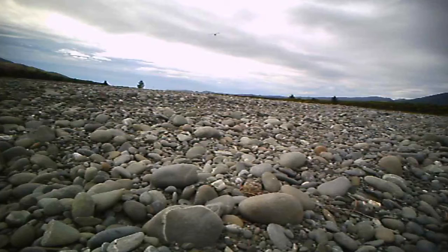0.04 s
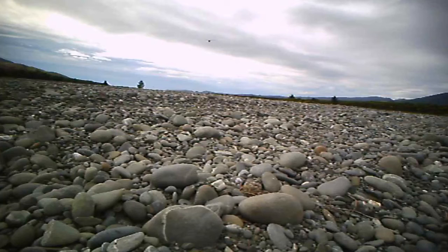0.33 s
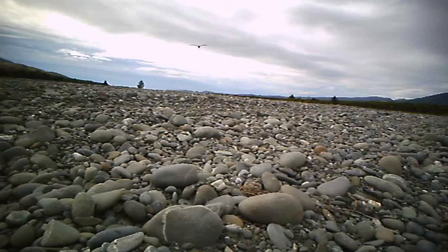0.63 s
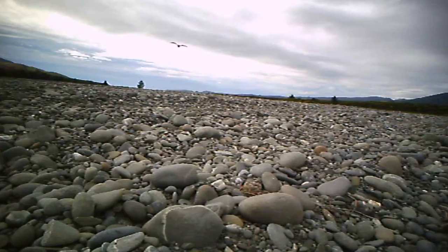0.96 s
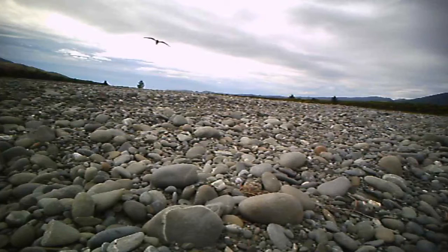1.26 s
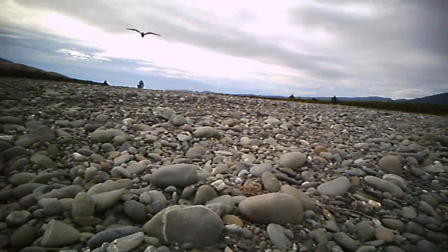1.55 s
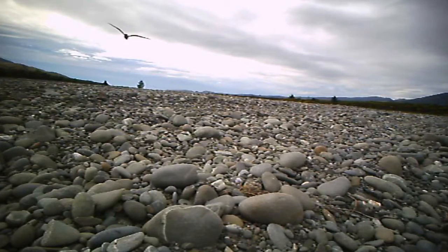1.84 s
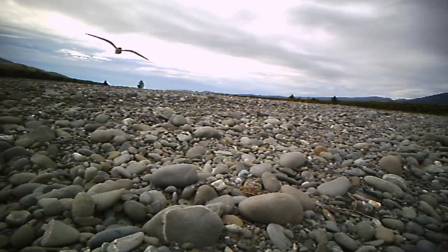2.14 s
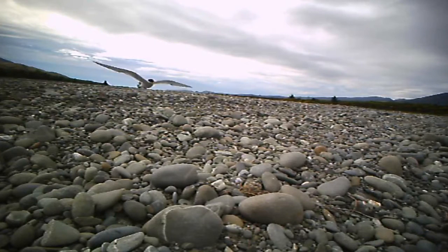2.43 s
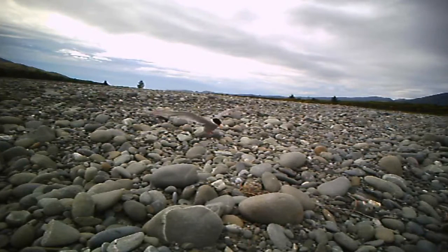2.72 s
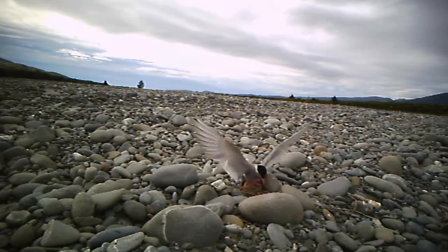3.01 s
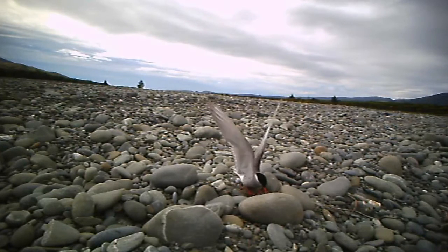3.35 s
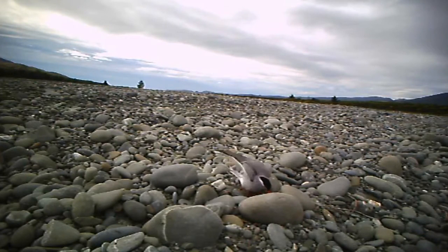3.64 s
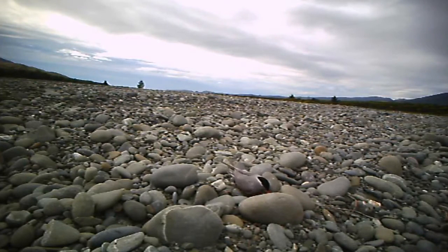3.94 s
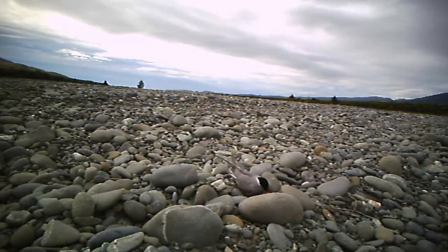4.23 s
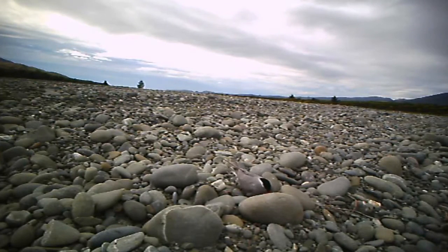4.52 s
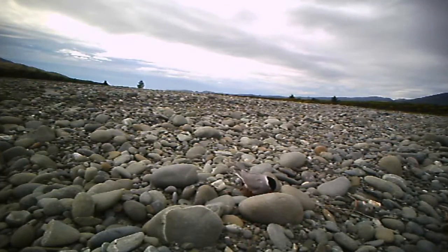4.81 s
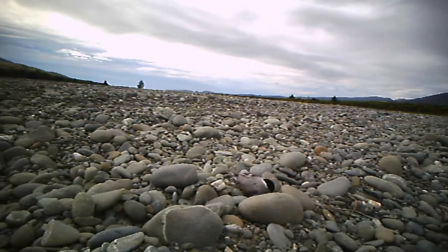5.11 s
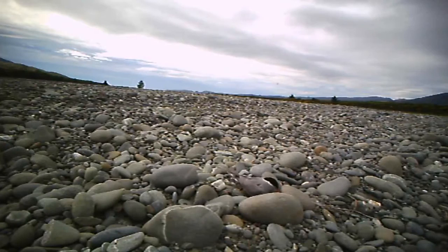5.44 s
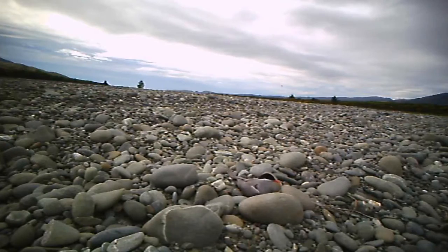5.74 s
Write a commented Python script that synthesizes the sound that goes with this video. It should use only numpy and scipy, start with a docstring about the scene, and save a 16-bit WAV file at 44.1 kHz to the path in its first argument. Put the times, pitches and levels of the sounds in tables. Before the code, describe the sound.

A seabird colony's high, arching cries and rattling rasps carry over gusty wind rumble, until one close bird gives three sharp calls.

```python
"""Tern colony on a stony riverbed, heard from the pebbles beside a nest.
Birds near and far cry (six partials on a pitch arch, shaped by the throat) and rasp (pulsed tone and
hiss); one lands with low wingbeats, then gives three sharp close calls. Stones scatter the sound.
Wind eddies buffet the microphone ports and ease after 4 s; the left port pops once.
A soft rush of air and river lies underneath; it and the far colony duck late on."""
import sys
import numpy as np
from scipy import signal
from scipy.fft import rfft, irfft
from scipy.io import wavfile
from scipy.ndimage import map_coordinates

SR = 44100
rng = np.random.default_rng(int(sys.argv[2]) if len(sys.argv) > 2 else 0)


def master_out(mix):
    """Clip the mix to full scale and print it as 16-bit PCM to the path in sys.argv[1]."""
    frames = np.transpose(np.atleast_2d(mix))
    ceiling = np.clip(frames, -1, 1)
    pcm = np.round(ceiling * 32767).astype(np.int16)
    wavfile.write(sys.argv[1], SR, pcm)


N = 258867
TIME_S = np.arange(N) / SR
BINS_HZ = np.maximum(np.arange(N // 2 + 1) * SR / N, 1)
SIDES = np.array([[.5], [-.5]])   # splits a left-minus-right difference

# Cries: (start [s], length [s], crest [Hz], relative level [dB], brightness [dB/octave], fall bend [-])
# Bend up to 1: straight slide; 3: held, then dropped.
NEAR_CRIES = [(0.534, 0.16, 2114, -42, 6.5, 1.5), (0.563, 0.22, 2240, -40.5, 5, 1.3),
              (0.736, 0.16, 2050, -52.5, -10.5, 1.7), (0.749, 0.039, 2090, -47, 1, 1.4),
              (1.006, 0.1, 2222, -37.5, 2.5, 1.47), (1.054, 0.112, 2230, -43.5, 4.0, 1.2),
              (1.092, 0.025, 2530, -39.5, -8, 1.7), (1.228, 0.116, 2380, -32.5, -1.5, 2),
              (1.271, 0.16, 1950, -46.5, 4, 0.99), (1.423, 0.087, 2303, -34, 1, 6),
              (1.446, 0.073, 2070, -43.0, -4, 1.9), (1.503, 0.17, 2137, -43.5, 4, 1.5),
              (1.639, 0.063, 2265.0, -36, 6, 2.1), (1.682, 0.088, 2155, -39, 2, 2.2),
              (1.873, 0.12, 2127, -38.5, 0.5, 1.1), (1.892, 0.13, 2512, -37.0, -1, 2.6),
              (2.052, 0.026, 2209.0, -52, -1.5, 2.0), (2.143, 0.039, 2267, -38.5, -1, 1.2),
              (2.175, 0.15, 2516, -39.5, -2, 1.1), (2.358, 0.026, 2140, -47, 10, 1.2),
              (2.385, 0.044, 2526, -45, -4, 1.2), (2.484, 0.15, 2242, -38, 3.5, 1.04),
              (2.531, 0.124, 2110, -42.5, 1, 1.53), (2.644, 0.095, 2570, -43.5, -2.5, 3),
              (2.808, 0.023, 2245, -38.5, -7, 2.1), (2.865, 0.08, 2170, -41, 6.5, 1.67),
              (2.944, 0.059, 2470, -38.5, 0.5, 1.5), (3.03, 0.039, 2230, -44.5, 3.5, 0.84),
              (3.187, 0.15, 2090, -42.5, 0, 2), (3.261, 0.086, 2499.0, -55.0, -8, 2.1),
              (3.444, 0.105, 2091.0, -45, -3, 1.6), (3.605, 0.2, 2133, -36.5, 1.0, 0.33),
              (3.749, 0.1, 2300, -41, 0.0, 1.8), (3.781, 0.13, 2124, -51.5, 7.5, 2),
              (3.929, 0.021, 2580, -43, -0.5, 1.6), (3.995, 0.041, 2154.0, -37.5, -2.5, 2.5),
              (4.019, 0.13, 2323, -38.5, -3.5, 2.15), (4.111, 0.12, 2210, -51, 2, 1.3),
              (4.326, 0.14, 2170, -56, -4, 1.6), (4.398, 0.23, 2208, -50, 1, 2.1),
              (4.578, 0.034, 2368, -39, 1, 3.3), (4.656, 0.041, 2276, -49, -5, 3.9),
              (4.78, 0.14, 2554, -54, -6.5, 1), (4.834, 0.135, 2644, -50, 4, 0.63),
              (4.849, 0.11, 2116, -50.5, 0.0, 2.5), (5.048, 0.086, 2247, -40.5, -2, 2),
              (5.055, 0.159, 2060, -63, 0.0, 0.5), (5.201, 0.23, 2210, -43, 4.5, 2.2),
              (5.401, 0.095, 2160, -39.5, 5, 1.5), (5.466, 0.083, 2485.0, -49.5, 3.5, 1.6),
              (5.746, 0.13, 2378, -51.5, -3.5, 1.3)]
NEST_CALLS = [(5.332, 0.037, 2366, -17, 0.44, 2.4), (5.426, 0.037, 2419, -13, -1, 1.55),
              (5.564, 0.041, 2420, -17, -1.6, 1.5)]
# Throat responses: (frequency [Hz], gain [dB])
THROAT = [(1700, -12.5), (2050, -11.5), (2300, -7.5), (2550, 0.5), (4000, -6.5), (4400, -6), (4750, -3.5),
          (5300, 5), (6200, -.5), (7000, -1.5), (7700, -4), (8700, -9.5), (10500, -15), (11700, -15),
          (13500, -42)]
NEST_THROAT = [(2400, -7.5), (4800, -8), (6000, 5.5), (7200, 1), (9600, -10.5), (12000, -5), (14400, -23)]
# Rattling rasps: (start [s], length [s], relative level [dB], hiss gain [dB])
RASPS = [(0.926, 0.25, -44.5, 6), (1.605, 0.28, -50.5, 10), (2.198, 0.17, -59.5, 14),
         (2.982, 0.24, -48.5, 1), (3.923, 0.3, -57.5, 11.5), (5.133, 0.16, -73, 23)]
# Low thumps of air, mostly right: wind gusts and, around 2.8-3.9 s, a landing bird's wingbeats.
# (centre [s], level [dB], sigma [s], left minus right [dB])
AIR_THUMPS = [(1.166, -40, 0.012, 27), (1.423, -35, 0.017, -19), (2.07, -30, 0.013, -23),
              (2.188, -38.5, 0.049, -13), (2.556, -41, 0.03, -5), (2.865, -36.5, 0.077, -35),
              (2.986, -32, 0.0089, -30), (3.403, -43.5, 0.11, -22.5), (3.823, -33, 0.02, -37),
              (4.045, -46, 0.058, -6)]
# Air puffs on the ports: (centre [s], level [dB], sigma [s])
BUFFETS = [(1.035, -36.5, 0.049), (1.433, -40.5, 0.0081), (4.585, -45, 0.011), (4.648, -49.5, 0.021)]
# Wind strength: (time [s], relative level [dB])
WIND_LEVEL = [(0.65, -63.5), (0.88, -55), (1.58, -49.5), (1.85, -55.5), (2.42, -55.5), (3.01, -38),
              (3.89, -47), (4.23, -75), (5.46, -66.5), (5.87, -77.5)]
# Background levels of far colony and rush, ducked by the recorder's noise suppression
# near 4.3, 5.0 and 5.7 s: (time [s], relative level [dB])
FAR_DUCKED_LEVEL = [(.5, -39.5), (.65, -42.5), (.87, -43), (1.45, -37.5), (2.25, -39), (2.44, -42),
                    (2.9, -38.5), (3.3, -41.5), (4.05, -41.5), (4.32, -53), (4.62, -42), (4.87, -49.5),
                    (4.99, -50.5), (5.12, -40), (5.42, -32.5), (5.56, -47), (5.68, -58.5), (5.82, -51)]
RUSH_DUCKED_LEVEL = [(0.65, -64), (0.72, -59), (0.84, -63.5), (3.99, -63), (4.26, -72.5), (5.35, -65.5),
                     (5.45, -65), (5.59, -70), (5.87, -78.5)]
# Noise spectra: (frequency [Hz], relative level [dB])
RASP_SPECTRUM = [(1200, -23), (2200, -17), (3000, -10), (4500, -8.5), (6500, -9.5), (8800, -15),
                 (10500, -18), (14000, -53)]
FAR_SPECTRUM = [(1000, -13.5), (1700, 0), (2200, 7), (2600, 5.5), (3100, 3.5), (4400, -1.5), (5200, 3),
                (6400, -7.5), (8500, 6.5), (10000, -7), (12000, -3), (14500, -18.5)]
WIND_SPECTRUM = [(12, -39.5), (20, -18), (60, 2.5), (125, -0.5), (180, -8), (381, -30), (900, -48),
                 (1170, -61.5), (1980, -120)]
BUFFET_SPECTRUM = [(30, -13), (110, -8.5), (250, -12.5), (500, -18.5), (900, -32.5), (3000, -52)]
RUSH_SPECTRUM = [(100, 7.5), (300, 6), (500, 1.5), (1000, -3), (1600, -5), (4000, -15.5), (14000, -25.5)]
# Port imbalance: (frequency [Hz], left minus right [dB])
PORT_BALANCE = [(1200, 29), (2200, 11), (2650, 11.5), (3400, 1), (4700, 0.5), (5700, 8.5), (6500, 7),
                (7100, 5), (7500, -2.5), (9000, -8.5), (11000, -1), (12000, -4), (14000, -16)]
# Port phase: (frequency [Hz], left lead [rad])
PORT_PHASE = [(500, .1), (2400, 0.87), (4700, 1.16), (7000, 1.65), (12000, 2.1)]


def cry(row, throat, jitter, shimmer_db, fall_jitter, swell, spread_s):
    """Six partials arch through the throat response, roughening as the pitch falls."""
    _, length_s, crest_hz, level_db, brightness_db_oct, bend = row
    t = np.arange(int(length_s * SR)) / SR
    crest_s = rise_s(length_s)
    rise_left = np.clip(1 - t / crest_s, 0, 1)
    fall = np.clip((t - crest_s) / (length_s - crest_s), 0, 1)
    arch_hz = crest_hz * (1 - .14 * rise_left ** 2.3 - .17 * fall ** max(bend, 1))
    pitch_hz = arch_hz * (1 + jitter * drift(136.4, len(t)) + fall_jitter * fall * drift(1497, len(t)))
    effort = (1 - (2 * t / length_s - 1) ** 2) ** swell * (arch_hz / crest_hz) ** 2.2
    effort *= from_db(level_db + shimmer_db * drift(217.2, len(t)))
    effort *= 1 + .18 * drift(1200, len(t))   # huskiness
    effort *= np.minimum(t / (.08 * length_s), 1)   # attack
    lag_s = spread_s * rng.standard_normal() * SIDES   # bearing
    phase = 2 * np.pi * (np.cumsum(pitch_hz) / SR + lag_s * pitch_hz)
    voice = 0
    for k in range(1, 7):
        tilt_db = brightness_db_oct * np.log2(k * crest_hz / 4730)
        voice += from_db(at_hz(throat, k * arch_hz) + tilt_db) * np.sin(k * phase)
    return np.sqrt(2) * effort * voice


def rise_s(length_s):
    """Time to crest; longer cries spend a smaller share rising."""
    return min(.05 * (length_s / .14) ** .7, .8 * length_s)


def flock(rows, throat, **voice):
    """One cry per row, mixed in at its start."""
    mix = np.zeros((2, N))
    for row in rows:
        start = int(row[0] * SR)
        sound = cry(row, throat, **voice)
        mix[:, start:start + sound.shape[1]] += sound[:, :N - start]
    return mix


def near_birds():
    """Cries and rasps with echoes off pebbles and banks."""
    cries = flock(NEAR_CRIES, THROAT, jitter=.00615, shimmer_db=.5, fall_jitter=.0021,
                  swell=.14, spread_s=30e-6)
    direct = from_db(-2.5) * cries + rasps()
    early = scatter(direct, t60_s=.015, wet_db=-4.5, first_s=.0011)
    late = scatter(direct, t60_s=.1, wet_db=-17, first_s=.013)
    return direct + early + late


def rasps(pulse_hz=72, centre_hz=2978, sweep=.045, open_share=.85,
          ramp_s=.0029, hold_s=.075, sag_db_s=18):
    """The voice bursts open in a train of noisy chirps; each rasp holds, then tires."""
    level, hiss_db = np.zeros(N), np.zeros(N)
    for start_s, length_s, level_db, hiss_gain_db in RASPS:
        age_s = TIME_S - start_s
        hiss_db[age_s >= 0] = hiss_gain_db
        window = np.clip(np.minimum(age_s, length_s - age_s) / ramp_s, 0, 1)
        level += window * from_db(level_db - sag_db_s * np.maximum(age_s - hold_s, 0))
    cycle = np.cumsum(pulse_hz * (1 + .071 * drift(25, N))) / SR % 1
    opening = np.minimum(cycle / open_share, 1)
    gate = unit_rms(np.sqrt(opening) * (1 - opening) ** 1.3)
    pitch_hz = centre_hz * (1 + sweep * (opening - .5) + .018 * drift(12, N) + .025 * drift(1400, N))
    phase = 2 * np.pi * np.cumsum(pitch_hz) / SR
    tone = sum(from_db(db) * np.sin(k * phase) for k, db in enumerate([1, -4.5, -12, -18.5], 1))
    hiss = from_db(hiss_db) * noise(RASP_SPECTRUM)[0]
    return level * gate * (tone + hiss)


def nest_bird(flutter_db=6, low_cut_hz=1500):
    """Sharp close calls; each breaks into fast, uneven flutter after its crest."""
    calls = flock(NEST_CALLS, NEST_THROAT, jitter=.0034, shimmer_db=.67, fall_jitter=.055,
                  swell=.45, spread_s=5e-6)
    breakup = sum(np.interp(TIME_S - start_s, [rise_s(length_s), length_s], [0, 1], right=0)
                  for start_s, length_s, *_ in NEST_CALLS)
    calls *= from_db(flutter_db * np.sqrt(breakup) * (np.tanh(drift(1800, N)) - 1.3))
    calls += scatter(calls, t60_s=.08, wet_db=-14, first_s=.0015)
    low_cut = signal.butter(2, low_cut_hz, "high", fs=SR, output="sos")
    return from_db([[-2], [-1.5]]) * signal.sosfilt(low_cut, calls)


def far_colony(count=140):
    """Faint random cries, mostly short, over a noise wash."""
    wash = noise(FAR_SPECTRUM)
    rows = [(when * (N / SR - .05), .035 + .2 * length ** 2, 1950 + 600 * height, -6 * faint, -3, 1.7)
            for when, length, height, faint in rng.random((count, 4))]
    cries = flock(rows, THROAT, jitter=.006, shimmer_db=2.5, fall_jitter=.004, swell=.7, spread_s=100e-6)
    return envelope(FAR_DUCKED_LEVEL) * (from_db(-10) * wash + from_db(-5) * unit_rms(cries))


def scatter(x, t60_s, wet_db, first_s):
    """Dense decaying echoes off pebbles and banks, different at each port."""
    t = np.arange(SR // 2) / SR
    echoes = rng.standard_normal((2, len(t))) * from_db(-60 * t / t60_s) * (t > first_s)
    echoes /= np.sqrt(np.sum(echoes ** 2, axis=1, keepdims=True)) + 1e-12
    return from_db(wet_db) * signal.fftconvolve(x, echoes, axes=1)[:, :N]


def ports(x):
    """The housing splits each frequency unevenly between left and right."""
    gain = pan(at_hz(PORT_BALANCE, BINS_HZ))
    phase = SIDES * at_hz(PORT_PHASE, BINS_HZ)
    return irfft(rfft(x) * gain * np.exp(1j * phase), N)


def wind_and_wings(gain_db=6.5, pan_db=-6, eddy_db=3.5, eddy_hz=35):
    """Eddies push on each port separately; gusts and wingbeats thump over the rumble."""
    steady = envelope(WIND_LEVEL, gain_db) * pan(pan_db)
    thumps = sum(from_db(level_db) * pan(side_db) * bump(centre_s, sigma_s)
                 for centre_s, level_db, sigma_s, side_db in AIR_THUMPS)
    eddies = from_db(eddy_db * np.array([drift(eddy_hz, N), drift(eddy_hz, N)]))
    return (steady + thumps) * unit_rms(noise(WIND_SPECTRUM) * eddies)


def buffets():
    """Brief puffs, brighter than the rumble."""
    puffs = sum(from_db(level_db) * bump(centre_s, sigma_s) for centre_s, level_db, sigma_s in BUFFETS)
    return puffs * noise(BUFFET_SPECTRUM)


def pop(start_s=1.1319, step_db=1, low_cut_hz=120, q=.76):
    """A step at the left port decays through the microphone's bass cut."""
    w = 2 * np.pi * low_cut_hz
    low_cut = signal.bilinear([1, 0, 0], [1, w / q, w * w], SR)
    step = from_db(step_db) * (TIME_S >= start_s)
    return signal.lfilter(*low_cut, step) * np.array([[1], [0]])


def rush(gain_db=10):
    """Soft noise of air and river."""
    return envelope(RUSH_DUCKED_LEVEL, gain_db) * noise(RUSH_SPECTRUM)


def from_db(db):
    return 10 ** (np.asarray(db) / 20)


def unit_rms(x):
    return x / np.sqrt(np.mean(x ** 2) + 1e-20)


def envelope(points, gain_db=0):
    return from_db(np.interp(TIME_S, *np.transpose(points)) + gain_db)


def bump(centre_s, sigma_s):
    return np.exp(-.5 * ((TIME_S - centre_s) / sigma_s) ** 2)


def pan(left_minus_right_db):
    """Constant-power channel gains."""
    gain = from_db(SIDES * left_minus_right_db)
    return gain / np.sqrt(np.mean(gain ** 2, axis=0))


def at_hz(points, hz):
    """Interpolate on log frequency."""
    knots_hz, values = np.transpose(points)
    return np.interp(np.log(hz), np.log(knots_hz), values)


def drift(rate_hz, size):
    """Smooth random curve, spread about 1."""
    knots = rng.standard_normal(max(size, SR // 2) // 16 + 8)
    return map_coordinates(knots, [np.arange(size) * min(rate_hz / SR, 1 / 16)], order=3, mode="mirror")


def noise(spectrum):
    """Shaped unit-rms noise, independent per channel."""
    white = rfft(rng.standard_normal((2, N)))
    return unit_rms(irfft(white * from_db(at_hz(spectrum, BINS_HZ)), N))


def scene():
    """Terns through the ports, over river and wind."""
    birds = near_birds() + nest_bird() + far_colony()
    return ports(birds) + rush() + wind_and_wings() + buffets() + pop()


def record(dry, fade_start_s=.47, fade_end_s=.62, cutoff_hz=14700):
    """Silence, quick fade-in, steep low-pass."""
    faded = dry * np.interp(TIME_S, [fade_start_s, fade_end_s], [0, 1])
    return signal.sosfilt(signal.ellip(10, .1, 80, cutoff_hz, fs=SR, output="sos"), faded)


dry = scene()
out = record(dry)
master_out(out)
```